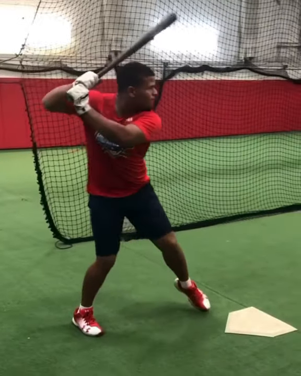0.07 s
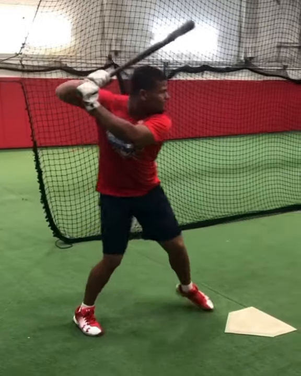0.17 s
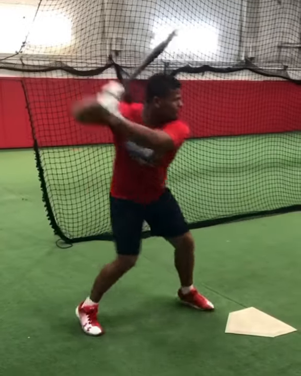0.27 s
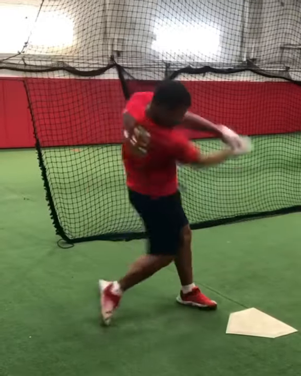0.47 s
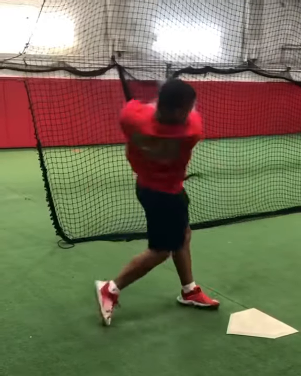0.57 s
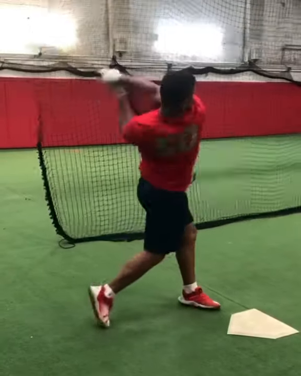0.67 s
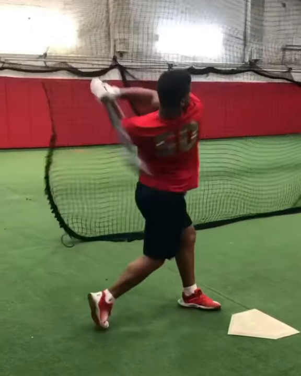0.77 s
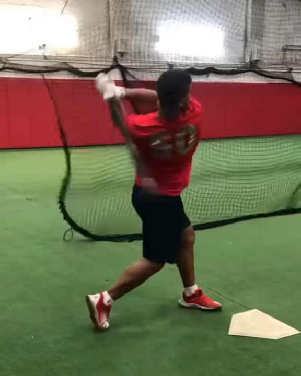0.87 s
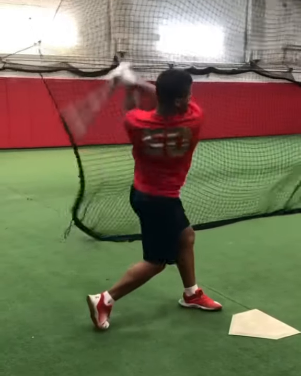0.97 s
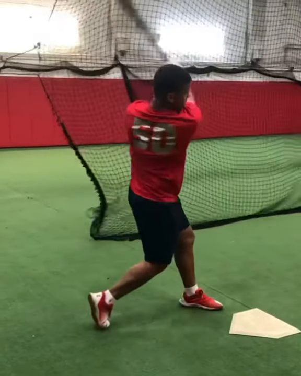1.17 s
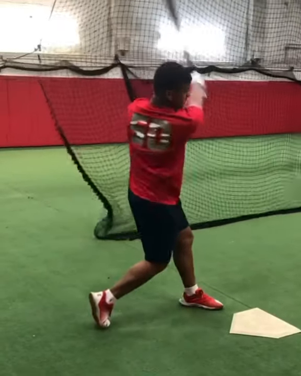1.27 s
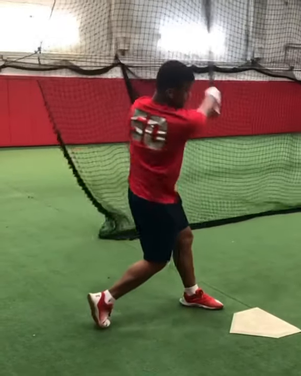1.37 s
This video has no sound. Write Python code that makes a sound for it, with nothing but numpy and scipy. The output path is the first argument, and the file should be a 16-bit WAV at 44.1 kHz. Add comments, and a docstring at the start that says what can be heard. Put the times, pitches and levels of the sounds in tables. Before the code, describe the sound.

One loud bright bat crack after a quick swish, then a long fading echo indoors

```python
"""A wooden bat cracks a ball in a large hard-walled hall, after a swish of air torn round the bat.
The blow is a short bright burst of noise and a damped knock of ringing modes; floor and walls send it back
as separate echoes that melt into a long tail, filtered noise whose bands die at their own rates.
Behind it ventilation hums: shaped air noise, a low rumble and wavering tones. Late on, the net rustles
in grainy noise over a rumble, and something knocks softly."""
import sys
import numpy as np
from scipy import signal
from scipy.fft import rfft, irfft
from scipy.io import wavfile
from scipy.ndimage import uniform_filter1d

SR = 44100
rng = np.random.default_rng(int(sys.argv[2]) if len(sys.argv) > 2 else 0)


def generate_wav(signal):
    """Clip the signal to [-1, 1] and save it as 16-bit WAV at the path in sys.argv[1]."""
    frames = np.transpose(np.atleast_2d(signal))
    scaled = np.clip(frames, -1, 1) * 32767
    pcm = np.round(scaled).astype(np.int16)
    wavfile.write(sys.argv[1], SR, pcm)


N = 61739
HIT_S = .23775  # the moment of the blow


def undb(db):
    """Turn decibels into an amplitude factor."""
    return 10 ** (np.asarray(db) / 20)


def unit(x):
    """Scale to rms 1."""
    return x / np.sqrt(np.mean(x ** 2))


def at_hz(table, hz):
    """Read a (frequency, value) table on a log-frequency axis."""
    table = np.array(table, float)
    return np.interp(np.log(np.maximum(hz, 1)), np.log(table[:, 0]), table[:, 1])


def curve(table, column):
    """Gain over time from a dB column."""
    table = np.array(table, float)
    return undb(np.interp(np.arange(N) / SR, table[:, 0], table[:, column]))


def noise(shape):
    """Noise of rms 1 whose spectrum follows the gain shape(Hz)."""
    f = np.arange(N // 2 + 1) * SR / N
    spectrum = rfft(rng.standard_normal(N)) * shape(f)
    return unit(irfft(spectrum, N))


def peak(hz, width_hz):
    """Gain of a steep resonance."""
    return lambda f: 1 / (1 + ((f - hz ** 2 / np.maximum(f, 1)) / width_hz) ** 2)


def ring(modes, t):
    """Damped modes struck at t = 0, each losing 60 dB in its t60."""
    t = np.maximum(t, 0)
    out = 0
    for hz, db, t60 in modes:
        decay = np.exp(-np.log(1000) * t / t60)
        out = out + undb(db) * np.sin(2 * np.pi * hz * t) * decay
    return out


def wander(rate_hz):
    """Slow smooth chance of rms 1: white noise averaged twice over 1 / rate_hz."""
    k = int(SR / rate_hz)
    return unit(uniform_filter1d(uniform_filter1d(rng.standard_normal(N), k), k))


def ventilation():
    """Broad air noise, a low rumble and three hums that waver in level and phase."""
    # Spectrum of the air noise: (frequency [Hz], relative level per Hz [dB])
    air_spectrum = [(88, -32), (150, -2), (916, 2), (1010, -1.5), (2450, -1.5), (5820, -11.5),
                    (14700, -21.5), (16500, -39)]
    # Hums: (frequency [Hz], rms level before wavering and swell [dB], wavering [dB])
    hums = [(58, -67, 3), (73, -61, 3.5), (120, -64, 2.5)]
    # Swell shared by hums and rumble: (time [s], gain [dB])
    hum_swell = [(0, -5.5), (.25, 9), (.7, 3.5), (.83, -2), (.95, 5.5), (1.15, -4.5), (1.4, -2)]
    air_db, rumble_db = -66, -61  # the rumble before its swell
    t = np.arange(N) / SR
    low = 0
    for hz, db, waver_db in hums:
        level = undb(db + waver_db * wander(7.7)) * np.sqrt(2)
        phase = 2 * np.pi * (hz * t + rng.random()) + .7 * wander(8.6)
        low = low + level * np.sin(phase)
    low = low + undb(rumble_db) * noise(peak(69.6, 68))
    # the air noise stops below the second frequency of its spectrum
    air = undb(air_db) * noise(lambda f: undb(at_hz(air_spectrum, f)) * (f > air_spectrum[1][0]))
    return air + curve(hum_swell, 1) * low


def net():
    """Grainy rustle and rumble of the settling net, with a few soft knocks of damped modes."""
    # Net movement: (time [s], rustle level [dB], low rumble level [dB])
    movement = [(1.06, -85, -74), (1.095, -72, -78), (1.12, -74, -66), (1.19, -66.5, -57), (1.26, -66, -60),
                (1.32, -74, -59), (1.4, -84, -62.5)]
    # Spectrum of the rustle: (frequency [Hz], relative level per Hz [dB])
    rustle_spectrum = [(3000, 0), (6000, 2.5), (9000, -9.5), (12000, -10), (16000, -8)]
    # Soft knocks: (time [s], level [dB])
    soft_knocks = [(1.121, -40), (1.136, -45), (1.147, -46)]
    # Modes of the knocking object: (frequency [Hz], relative level [dB], t60 [s])
    knock_modes = [(300, -11, .04), (670, -2, .045), (950, -6, .025), (1300, -3, .03)]
    grain_db, grain_samples, fade_in_s = 3.5, 64, 0.056
    t = np.arange(N) / SR
    # each grain holds one random level
    steps = np.repeat(rng.standard_normal(N // grain_samples + 1), grain_samples)[:N]
    grain = unit(undb(grain_db * steps))

    def rustle_gain(f):
        """Tabled spectrum, falling 12 dB per octave below its first frequency."""
        return undb(at_hz(rustle_spectrum, f)) * np.minimum(f / rustle_spectrum[0][0], 1) ** 2

    rustle = curve(movement, 1) * grain * noise(rustle_gain)
    rumble = curve(movement, 2) * noise(peak(248, 400))
    fade_in = np.clip((t - movement[0][0]) / fade_in_s, 0, 1)
    knocks = sum(undb(db) * ring(knock_modes, t - s) for s, db in soft_knocks)
    return (rustle + rumble) * fade_in + knocks


def swing():
    """Air tearing round the bat: a bright swish and a low whoosh that die away after contact."""
    # Course of the swing: (time [s], swish level [dB], low whoosh level [dB])
    course = [(.09, -76, -80), (.12, -73.5, -67), (.152, -56.5, -70), (.17, -54, -60), (.195, -58.5, -54.5),
              (.215, -51, -45), (.234, -51, -46)]
    # Spectrum of the swish: (frequency [Hz], relative level per Hz [dB])
    swish_spectrum = [(590, -50), (1000, -7), (1780, -9), (1910, -6), (11200, -20.5), (15600, -23.5),
                      (16500, -31)]
    fade_s = 0.024  # time constant after contact
    t = np.arange(N) / SR
    swish = curve(course, 1) * noise(lambda f: undb(at_hz(swish_spectrum, f)))
    whoosh = curve(course, 2) * noise(peak(200, 260))
    fade = np.exp(-np.maximum(t - HIT_S, 0) / fade_s)
    return (swish + whoosh) * fade * (t > course[0][0])


def hall():
    """Dense echoes: near scatter at once, the whole hall once the far walls answer, dying band by band."""
    # Spectrum of the dense echoes: (frequency [Hz], relative level per Hz [dB])
    echo_spectrum = [(35, -47), (60, -21), (283, -14.5), (521, -10.5), (870, -1), (1080, -1), (1610, -3),
                     (2040, -5), (3110, -2.5), (4000, -6), (4700, -10.5), (7000, -17.5), (10500, -22),
                     (15000, -26.5), (16500, -42)]
    # Reverberation time of the whole hall: (frequency [Hz], t60 [s])
    hall_t60 = [(60, 3.5), (250, 2.58), (500, 1.78), (1000, 2.175), (2000, 1.99), (3000, 2.044),
                (4500, 1.6), (6500, 1.2), (9000, 0.86), (12000, 0.88), (16000, 0.38)]
    hall_db, far_wall_s, far_rise_s = -23, 0.041, 0.016
    near_db, near_rise_s, near_t60_s = -15.5, 0.0071, .25
    near_tilt_db = 5.5  # per octave above 6 kHz
    patchy_db, patch_hz = .7, 81.6
    t = np.maximum(np.arange(N) / SR - HIT_S, 0)
    late = np.maximum(t - far_wall_s, 0)
    f = np.maximum(np.arange(N // 2 + 1) * SR / N, 1)
    dense = rfft(noise(lambda f: undb(at_hz(echo_spectrum, f))))
    patchy = undb(patchy_db * wander(patch_hz))
    out = 0
    for hz in 50 * 2 ** np.arange(0, 8.6, 1 / 3):
        # overlapping triangular bands a third of an octave apart
        band_gain = np.clip(1 - 3 * np.abs(np.log2(f / hz)), 0, 1)
        band = irfft(dense * band_gain, N)
        near_level = near_db + near_tilt_db * max(np.log2(hz / 6000), 0)
        near = undb(near_level - 60 * t / near_t60_s) * (1 - np.exp(-t / near_rise_s))
        far = undb(hall_db - 60 * late / at_hz(hall_t60, hz)) * (1 - np.exp(-late / far_rise_s))
        out = out + band * np.hypot(near, far)
    return out * patchy


def blow():
    """Each arrival: a burst of treble noise, then the knock of bat and ball as damped modes."""
    # Ringing of bat and ball: (frequency [Hz], relative level [dB], t60 [s])
    bat_modes = [(1100, -14, .007), (2000, -5, .0035), (3300, -9, .0035), (7000, -20, .003)]
    # Direct blow, then its clearest echoes: (time after the blow [s], knock gain [dB], crack gain [dB])
    arrivals = [(0, -1, 0), (.0021, 0, -4), (.0037, -5, -11), (.0046, -8, -14), (.0053, 0, -13),
                (.0113, -4, -12), (.0124, -7, -20), (.0134, -5, -18), (.0203, -7, -11), (.0253, -8, -4),
                (.0261, -6, -16), (.0339, -10, -6), (.0386, -8, -14), (.0393, -4, -14), (.0637, -9, -22),
                (.0676, -11, -22), (.0721, -12, -22), (.0753, -8, -14)]
    crack_s, crack_db, crack_hz = .0002, -13, 4800  # time to the burst's peak, level, treble corner
    knock_lag_s = .00072
    knock_low_hz = 850  # the small bat radiates little below this
    t = np.arange(N) / SR - HIT_S
    treble = noise(lambda f: (f / crack_hz) ** 4 / (1 + (f / crack_hz) ** 4))
    cracks, knocks = 0, 0
    for lag, knock_gain_db, crack_gain_db in arrivals:
        u = np.maximum(t - lag, 0) / crack_s
        burst = u * np.exp(1 - u)
        cracks = cracks + undb(crack_db + crack_gain_db) * treble * burst
        knocks = knocks + undb(knock_gain_db) * ring(bat_modes, t - lag - knock_lag_s)
    highpass = signal.butter(3, knock_low_hz, "high", fs=SR, output="sos")
    return cracks + signal.sosfilt(highpass, knocks)


def scene():
    """Everything that reaches the single microphone, from the blow to the background."""
    return (blow() + hall() + swing() + ventilation() + net())[None, :]


def record(dry):
    """The phone cuts the top: a steep lowpass at 16050 Hz."""
    lowpass = signal.ellip(10, .2, 80, 16050, fs=SR, output="sos")
    return signal.sosfilt(lowpass, dry)


dry = scene()
out = record(dry)
generate_wav(out)
```